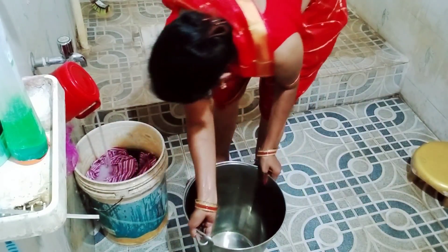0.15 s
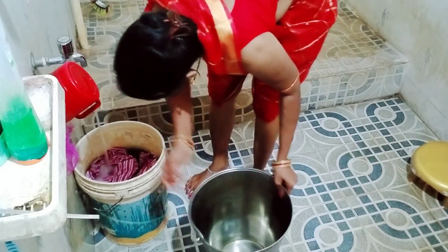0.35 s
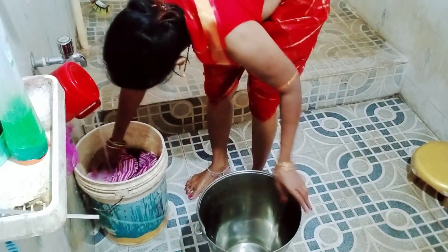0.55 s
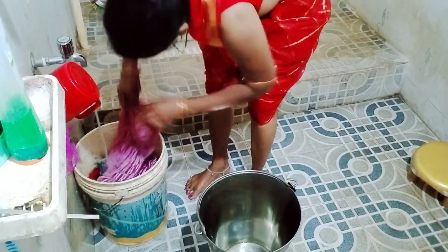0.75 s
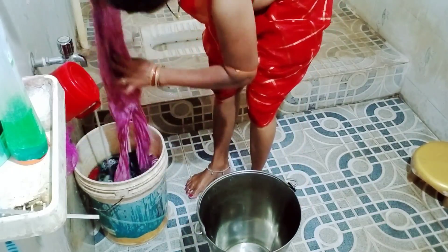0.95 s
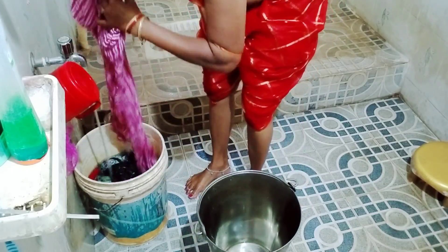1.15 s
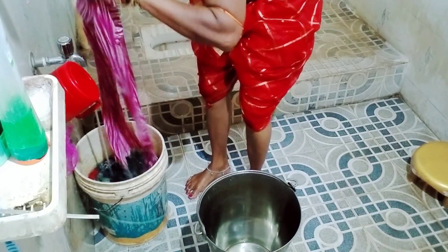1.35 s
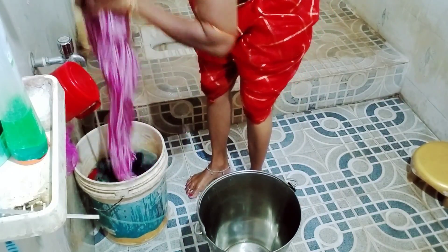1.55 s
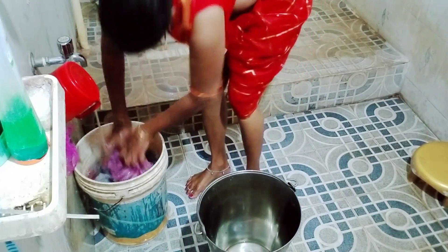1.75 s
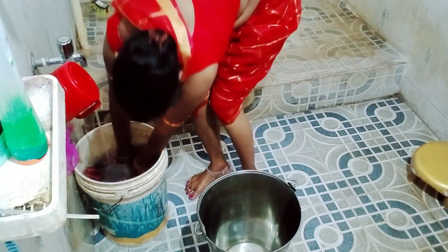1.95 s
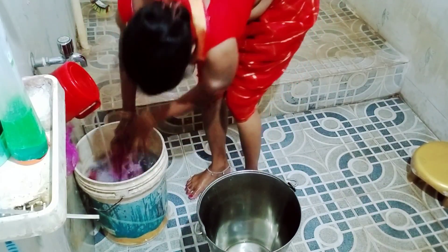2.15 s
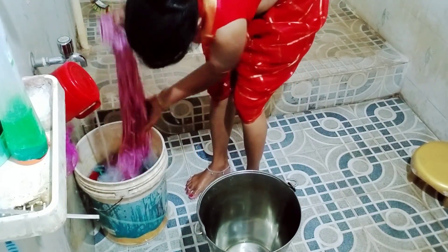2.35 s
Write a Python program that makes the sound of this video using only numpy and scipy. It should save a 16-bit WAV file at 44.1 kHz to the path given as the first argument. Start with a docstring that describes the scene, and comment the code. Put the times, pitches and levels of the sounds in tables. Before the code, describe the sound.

Close by, a steel pot is dragged over tiles with a juddering scrape and a clank. Afterwards water streams off wet laundry, which is plunged back into a bucket and sloshed, in a small, ringing bathroom with a low hum.

```python
"""A steel pot is dragged over a tiled bathroom floor, close to a single microphone: it sticks and slips,
scrapes on grit, drops on its base and rocks to rest. Then, with more of the room around it, a wet cloth
is lifted from a plastic bucket, streams into it, and is plunged back and sloshed about: bubbles ring,
drops patter, bangles touch twice. The small hard room rings over a low steady background."""
import sys
import numpy as np
from scipy import signal
from scipy.fft import rfft, irfft
from scipy.io import wavfile
from scipy.ndimage import uniform_filter1d

SR = 44100
rng = np.random.default_rng(int(sys.argv[2]) if len(sys.argv) > 2 else 0)


def pcm_store(signal):
    """Save signal as 16-bit PCM."""
    levels = np.round(np.clip(np.atleast_2d(signal), -1, 1) * 32767)
    wavfile.write(sys.argv[1], SR, levels.astype(np.int16).T)


N = 110250
TIME = np.arange(N) / SR


def undb(db):
    """Decibels to gain."""
    return 10 ** (np.asarray(db) / 20)


def unit(x):
    """Scale to rms 1."""
    return x / np.sqrt(np.mean(x ** 2))


def steady(x):
    """Hold the swing of a vibration near rms 1."""
    power = np.abs(uniform_filter1d(x ** 2, size=900))
    return x / np.sqrt(power + 1e-4 * x.var())


def curve(rows, column=1):
    """Gain over time from one dB column of a table."""
    rows = np.array(rows)
    return undb(np.interp(TIME, rows[:, 0], rows[:, column]))


def fade(t60):
    """Exponential decay, 60 dB in t60 seconds."""
    return np.exp(-np.log(1000) * TIME / t60)


def add(out, start, x):
    """Mix a sound in at a time in seconds."""
    i = int(np.clip(start * SR, 0, N - 1))
    out[i:i + len(x)] += x[:N - i]


def through(x, response):
    """Pass a sound through an impulse response."""
    return signal.fftconvolve(x, response)[:N]


def colour(x, points, size=4096):
    """Minimum-phase filter through (Hz, dB) points, with unit power gain."""
    hz, db = np.array(points).T
    grid_hz = np.maximum(np.arange(size // 2 + 1) * SR / size, 1)
    gain = undb(np.interp(np.log(grid_hz), np.log(hz), db))
    cepstrum = irfft(np.log(gain))
    cepstrum[1:size // 2] *= 2
    cepstrum[size // 2 + 1:] = 0
    response = irfft(np.exp(rfft(cepstrum)))
    return through(x, response / np.linalg.norm(response))


def noise(points):
    """Noise with a spectrum through (Hz, dB) points."""
    return colour(rng.standard_normal(N), points)


def ring(modes):
    """Response of (Hz, dB, t60) modes to a tap."""
    return sum(undb(db) * np.sin(2 * np.pi * hz * TIME) * fade(t60) for hz, db, t60 in modes)


def soften(x, contact_s):
    """Spread each tap over the time of contact."""
    age = np.arange(400) / SR / contact_s
    push = age * np.exp(-age)
    return through(x, push / push.sum())


def crackle(per_s, spread_db):
    """Dense random clicks of uneven size."""
    sizes = undb(spread_db * np.minimum(rng.exponential(size=N), 3))
    hits = rng.random(N) < per_s / SR
    return unit(hits * sizes * np.sign(rng.standard_normal(N)))


def bubble(hz, cycles, rise=0.075):
    """A bubble rings and rises in pitch as it dies, losing 27 dB over the given cycles."""
    age = np.arange(int(2 * cycles * SR / hz)) * hz / SR / cycles
    phase = 2 * np.pi * cycles * (age + rise * age * age / 2)
    return np.sin(phase) * np.exp(-np.pi * age) * (1 - np.exp(-2 * age * cycles))


def room(x, wet_db, low_t60=0.5, treble_t60=0.57):
    """The direct sound reaches the microphone first, the dense tail off the tiles 4 ms later."""
    hiss = rng.standard_normal(N)
    low = signal.sosfilt(signal.butter(2, 2500, fs=SR, output="sos"), hiss)
    tail = (low * fade(low_t60) + (hiss - low) * fade(treble_t60)) * (TIME > .004)
    reverb = through(x, tail / np.linalg.norm(tail))
    return (x + undb(wet_db) * reverb) / np.hypot(1, undb(wet_db))


# The bathroom's own tone. Each row: frequency in Hz, relative level in dB.
ROOM_TONE = [(30, -64), (90, -18), (140, -5), (185, -9.5), (225, -8), (305, 1.5), (500, -20.5), (680, 3.5),
             (900, -3.5), (1300, -18), (2400, -42), (5000, -16.5), (8000, -21), (12000, -20.5),
             (14500, -14.5), (15500, -18)]

def room_tone():
    """Low steady noise behind everything."""
    return undb(-49.5) * noise(ROOM_TONE)


# Bangles touching. Each row: start in seconds, pitch in Hz, level in dB, t60 in seconds.
BANGLE_CLINKS = [(1.737, 12040, -43.5, 0.16), (2.261, 3500, -47.5, 0.46)]

def bangles(spread_hz=170):
    """Thin, high, chattering clinks, each a narrow band of noise dying away."""
    out = np.zeros(N)
    for start, hz, db, t60 in BANGLE_CLINKS:
        band = ring([(hz, 0, 2 / spread_hz)])
        chatter = steady(through(rng.standard_normal(N), band))
        add(out, start, undb(db) * chatter * fade(t60))
    return out


# Strokes of the cloth. Each row: start in seconds, length in seconds, level in dB.
CLOTH_STROKES = [(0.791, 0.061, -48.5), (0.916, 0.078, -51), (1.077, 0.077, -46.5), (1.358, 0.062, -47.5),
                 (1.622, 0.035, -48.5)]
# The cloth's hiss. Each row: frequency in Hz, relative level in dB.
CLOTH_COLOUR = [(500, -32), (1500, 4), (3300, -17), (5000, 9.5), (6500, 8), (8000, -3), (15500, -7.5)]

def cloth():
    """Wet cloth swishes as it slides through the hands."""
    rub = np.zeros(N)
    for start, length, db in CLOTH_STROKES:
        add(rub, start, undb(db) * np.hanning(int(length * SR)))
    return colour(crackle(per_s=11000, spread_db=3.2), CLOTH_COLOUR) * rub


# Water running off the cloth and slopping. Each row: time in seconds, bubbles in dB, spray in dB.
WATER_FLOW = [(0, -44, -54), (.2, -52.5, -56), (.76, -48, -53), (.82, -49, -57), (.88, -52.5, -54.5),
              (.95, -50, -50), (1.07, -43, -52.5), (1.15, -40.5, -46.5), (1.22, -45, -49),
              (1.39, -50, -47.5), (1.48, -55.5, -54.5), (1.58, -42.5, -45), (1.7, -46, -44),
              (1.79, -43, -45), (1.85, -45.5, -56.5), (1.91, -37, -43.5), (1.96, -34.5, -44),
              (2.03, -41, -43), (2.14, -40, -47), (2.25, -38.5, -49), (2.34, -41.5, -48), (2.5, -40, -48)]
# The patter of drops. Each row: frequency in Hz, relative level in dB.
DROP_COLOUR = [(400, -26), (1400, 3), (2500, -6.5), (3500, 2.5), (5200, 3.5), (6500, -1), (8000, -8),
               (12000, -8), (15500, 0)]

def spray(spurts_per_s=22, spurt_db=2.6):
    """Fine drops patter in random spurts."""
    drops = colour(crackle(per_s=3500, spread_db=1.5), DROP_COLOUR)
    spurt_index = np.arange(N) / int(SR / spurts_per_s)
    surges = np.interp(spurt_index, np.arange(500), rng.standard_normal(500))
    return drops * curve(WATER_FLOW, column=2) * undb(spurt_db * surges)


# Air in the bucket and room. Each row: frequency in Hz, relative level in dB.
HOLLOW_COLOUR = [(60, -40), (175, -24), (228, -1), (265, -23.5), (315, 2), (380, -6.5), (450, -7), (510, 5),
                 (590, -10), (675, 5), (790, -7.5), (865, 4), (980, -1.5), (1170, -5), (1300, 1),
                 (1480, 1.5), (1900, -0.5), (3000, 2.5), (8000, -44.5)]

def trickle(per_s=1200, low_hz=230, high_hz=3200, spread_db=14.5, db_per_octave=-1):
    """Many small bubbles ring in the hollow of the bucket, swelling with the flow."""
    out = np.zeros(N)
    for when, pitch, size, life in rng.random((int(per_s * N / SR), 4)):
        hz = low_hz * (high_hz / low_hz) ** pitch
        db = spread_db * size ** 2 + db_per_octave * np.log2(hz / low_hz)
        add(out, when * N / SR, undb(db) * bubble(hz, cycles=4 * (.5 + life)))
    return unit(colour(out, HOLLOW_COLOUR)) * curve(WATER_FLOW)


def slap(decay, top_hz, count=110, span_octaves=1.486, sink_octaves=1.12, attack_s=0.0031):
    """A burst of bubbles: the small ones close first, larger and lower ones follow."""
    cloud = np.zeros(N)
    for k, (jitter, pitch, size) in enumerate(rng.random((count, 3))):
        age = 5 * (k + jitter) / count  # in decay times
        octaves_down = span_octaves * pitch + sink_octaves * (1 - np.exp(-age))
        add(cloud, age * decay, (.5 + size) * bubble(top_hz * 2 ** -octaves_down, cycles=5.1))
    return steady(cloud) * (1 - np.exp(-TIME / attack_s)) * np.exp(-TIME / decay)


# Cloth hitting water. Each row: start in seconds, level in dB, decay in seconds, top bubble pitch in Hz.
CLOTH_SLAPS = [(1.532, -41.5, 0.016, 2580), (1.568, -33, 0.028, 2240), (1.673, -28, 0.021, 2660),
               (1.718, -31.5, .014, 1830), (1.92, -26, 0.024, 3070), (1.99, -31, 0.02, 3400),
               (2.055, -36, 0.037, 4370), (2.222, -37, 0.02, 1695)]
# Large air pockets closing. Each row: start in seconds, pitch in Hz, level in dB.
AIR_GULPS = [(1.232, 720, -29.5), (1.266, 735, -24), (1.575, 667, -40), (1.577, 320, -35), (1.68, 770, -25),
             (1.765, 695, -21.5), (1.78, 367, -27.5), (1.928, 1820, -31), (1.933, 452, -18.5),
             (1.947, 357, -23), (1.968, 516, -26), (2.025, 700, -27), (2.04, 221, -30.5), (2.175, 497, -26),
             (2.2, 339, -23), (2.24, 231, -31.5), (2.232, 1156, -22), (2.281, 455, -22.5),
             (2.368, 659, -20.5), (2.404, 505, -26), (2.448, 780, -18)]

def plunges():
    """The cloth slaps the water and traps pockets of air that gulp."""
    out = np.zeros(N)
    for start, db, decay, top_hz in CLOTH_SLAPS:
        add(out, start, undb(db) * slap(decay, top_hz))
    for start, hz, db in AIR_GULPS:
        add(out, start, undb(db) * bubble(hz, cycles=6.5))
    return out


# Air modes of the bucket. Each row: frequency in Hz, relative level in dB, t60 in seconds.
BUCKET_MODES = [(222.14, -8, 0.43), (321, -3, 0.23), (454.6, 5, 0.14), (495, -16, 0.18),
                (681.6, -7.5, 0.48), (750, 2, 0.21), (874.5, 2, 0.21), (1173, 3.5, 0.19), (1480, -14, 0.25),
                (2944, -9.5, 0.96)]

def bucket_ring(water):
    """The slopping water rings the air in the bucket."""
    return undb(-3.5) * water.std() * unit(through(water, ring(BUCKET_MODES)))


# Deep thumps. Each row: start in seconds, level in dB.
LOW_THUMPS = [(0.244, -26), (0.282, -26.5), (.325, -25), (0.427, -27), (0.474, -21), (0.527, -36)]

def low_thumps():
    """Faint deep thumps that go with the pot's loudest jolts."""
    out = np.zeros(N)
    for start, db in LOW_THUMPS:
        rumble = noise([(25, -10), (60, 2), (110, 6), (170, 9), (400, -41), (2000, -78)])
        add(out, start, undb(db) * steady(rumble) * fade(t60=0.086))
    return soften(out, 0.00039)


# Pressure on the grit under the base. Each row: time in seconds, level in dB.
GRIT_PRESSURE = [(.235, -54), (.245, -36), (.265, -34.5), (.29, -40.5), (.32, -41), (.333, -33),
                 (.355, -31), (.42, -41), (.44, -32), (.475, -39.5), (.49, -32), (.515, -28), (.54, -34),
                 (.565, -33.5), (.61, -41), (.7, -78)]
# The grit's rasp. Each row: frequency in Hz, relative level in dB.
RASP_COLOUR = [(500, -21), (1100, -15), (1600, -3.5), (1900, -10.5), (2250, -2), (3100, -13.5), (3800, 7),
               (4350, -1.5), (5200, 3.5), (6300, 0.5), (8000, -5.5), (12000, -4), (15500, -8)]
# Modes of the pot's wall. Each row: frequency in Hz, relative level in dB, t60 in seconds.
WALL_MODES = [(1460, -22, 0.27), (1540, -5, 0.16), (1565, 7, 0.2), (1624, 1, 0.11), (2136, -11, 0.19),
              (2163, -6, 0.31), (2239, -2.5, .15), (2273, 3, 0.2), (2520, -4.5, 0.12), (2853, -1, 0.16),
              (3490, 0, 0.057), (3593, 11.5, 0.12), (3800, 2, 0.29), (3980, -0.5, 0.16), (4220, -5, 0.13)]

def pot_scrape(flutter_depth=0.51, flutter_hz=70, bite_hz=5500):
    """Grit rasps under the steel and sets the wall singing, with a flutter as the rim chatters."""
    pressure = curve(GRIT_PRESSURE)
    grit = crackle(per_s=12000, spread_db=2.5) * pressure
    flutter = 1 + flutter_depth * unit(noise([(flutter_hz, 0), (10 * flutter_hz, -50)]))
    wall = unit(through(grit, ring(WALL_MODES)) * flutter) * grit.std()
    rasp = colour(grit, RASP_COLOUR)
    dull = signal.sosfiltfilt(signal.butter(2, bite_hz, fs=SR, output="sos"), rasp)
    bite = (pressure / pressure.max()) ** 0.49  # brighter when pressed hard
    return dull + (rasp - dull) * bite + undb(-4.5) * wall


# Squeals. Each row: start and length in seconds, pitch in Hz, glide in Hz per second, level in dB.
RIM_SQUEALS = [(.236, 0.0091, 525, -2, -4.5), (.262, 0.0405, 857, -1300, -14.5),
               (.405, 0.033, 515.5, 5, -12), (.425, 0.011, 672.5, -3, -18), (.44, 0.075, 1542, -3, -38),
               (.475, 0.045, 851, -15, -20.5), (0.485, .025, 3980, 0, -45), (.54, 0.032, 2853, -2, -37),
               (.59, 0.031, 846, 0, -25.5)]

def pot_squeals(t60=0.15):
    """Friction locks on to one wall mode, which swells and bends while the rim rubs, then rings out."""
    out = np.zeros(N)
    for start, length, hz, glide, db in RIM_SQUEALS:
        swell = np.minimum(TIME / length, 1)
        release = undb(-60 * np.maximum(TIME - length, 0) / t60)
        pitch = hz + glide * np.minimum(TIME, 2 * length)
        add(out, start, undb(db) * swell * release * np.sin(2 * np.pi * np.cumsum(pitch) / SR))
    return out


# The pot's modes. Each row: frequency in Hz, relative dB when dragged and when knocked, t60 in seconds.
POT_MODES = [(227.1, -20.5, -31, 0.2), (267, -19.5, -22, 0.47), (303.3, -46, -8.5, 0.57),
             (410.1, -16, -10, 0.41), (442.7, -7, -2.5, 0.53), (494, -6.5, -5, 0.33),
             (517.4, 2, -4.5, 0.46), (552, -15, -4.5, 0.43), (680, -7.5, -11.5, 0.3),
             (760, -5, -12.5, 0.24), (790, -6, -18, 0.2), (847.5, -18.5, -8.5, 0.55),
             (888, -12.5, -29, 0.21), (1110, -44, -22.5, .3), (1211, -44, -21, 0.47),
             (1242, -36, -27.5, 0.57), (1526, -30.5, -34, 0.59), (1720, -30, -34, .2),
             (1835, -35, -32, 0.29)]
# The dull thud of the base. Each row: frequency in Hz, relative level in dB.
THUD_COLOUR = [(30, -34), (140, -47), (220, -20.5), (330, -12), (490, 11), (800, -15), (920, -17),
               (1030, -19.5), (1700, -27), (2600, -62), (8000, -81)]
# The base striking the tiles. Each row: start in seconds, relative level in dB.
BASE_KNOCKS = [(.237, 0.5), (.335, 1), (.436, -4), (.477, 10.5), (.489, -0.5), (.501, -7.5), (.538, 2),
               (.582, 2), (.614, -6.5), (.642, -8), (.661, -10), (.689, -17.5), (.714, -30)]

def pot_knocks(rise_s=0.00076):
    """The base bumps over the tiles, drops and rocks to rest; each knock thuds and rings the steel."""
    out = np.zeros(N)
    metal = undb(-22) * ring([(hz, db, t60) for hz, _, db, t60 in POT_MODES])
    rise = 1 - np.exp(-(TIME / rise_s) ** 2)
    for start, db in BASE_KNOCKS:
        thud = undb(-18) * steady(noise(THUD_COLOUR)) * fade(t60=0.067)
        add(out, start, undb(db) * rise * (metal + thud))
    return soften(out, contact_s=0.0001)


# Pressure of the drag. Each row: time in seconds, level in dB.
DRAG_PRESSURE = [(.235, -64), (.241, -9.5), (.255, -13), (.335, -11), (.35, -19.5), (.385, -17.5),
                 (.402, -31.5), (.425, -14), (.465, -18), (.5, -17), (.54, -33), (.6, -57.5)]

def pot_judder(slips_per_s=170, gap_scatter=0.28, spread_db=3.9, kick_rad=0.503):
    """The base sticks and slips; friction keeps each mode swinging and every slip jolts its phase."""
    gaps, sizes = rng.standard_normal((900, 2)).T
    slip_at = (np.cumsum(np.exp(gap_scatter * gaps)) * SR / slips_per_s).astype(int)
    slips, tone = np.zeros(N), np.zeros(N)
    slips[slip_at[slip_at < N]] = undb(spread_db * sizes[slip_at < N])
    for hz, db, _, _ in POT_MODES:
        jolts = np.interp(np.arange(N), slip_at, np.cumsum(rng.standard_normal(len(slip_at))))
        tone += undb(db) * np.sin(2 * np.pi * hz * TIME + kick_rad * jolts)
    body = colour(soften(slips - slips.mean(), contact_s=0.00045), THUD_COLOUR)
    return steady(unit(tone) + undb(-6) * unit(body)) * curve(DRAG_PRESSURE)


def scene():
    """At the microphone, in mono: the pot close and mostly direct, the washing deep in the room's ring."""
    background = room_tone()
    pot = room(pot_judder() + pot_knocks() + pot_squeals() + low_thumps(), wet_db=-10)
    pot += room(pot_scrape(), wet_db=-7)
    water = plunges() + trickle()
    washing = room(water + bucket_ring(water), wet_db=2.5)
    washing += room(spray() + cloth(), wet_db=-2)
    clinks = room(bangles(), wet_db=-8)
    return (pot + washing + clinks + background)[None]


def limit(x, ceiling_db=-13, release_s=0.017):
    """The recorder's limiter turns the level down while the sound is loud."""
    keep = np.exp(-1 / (release_s * SR))
    power = np.abs(uniform_filter1d(x ** 2, size=260))
    held = np.maximum(power, signal.lfilter([1 - keep], [1, -keep], power))
    return x / np.sqrt(np.hypot(1, held / undb(ceiling_db) ** 2))


def record(dry, low_cut_hz=210, leak_db=-15, top_hz=15500):
    """The recorder cuts most of the bass, limits the peaks and drops the very top."""
    low_cut = signal.butter(8, low_cut_hz, "high", fs=SR, output="sos")
    top_cut = signal.ellip(10, .2, 80, top_hz, fs=SR, output="sos")
    thin = signal.sosfilt(low_cut, dry) + undb(leak_db) * dry
    return signal.sosfilt(top_cut, limit(thin))


dry = scene()
out = record(dry)
pcm_store(out)
```